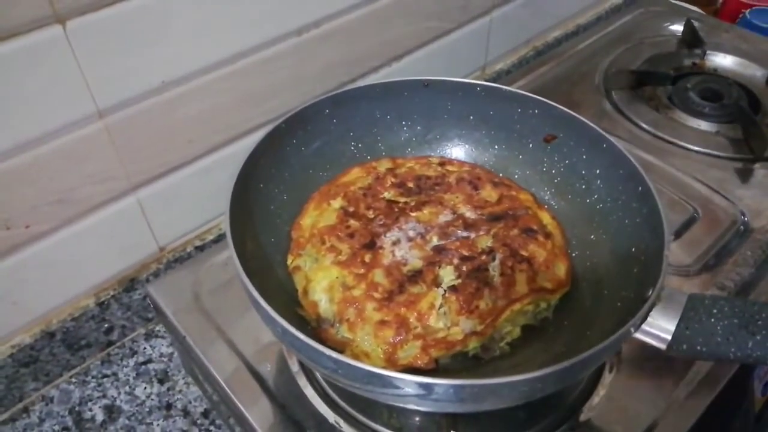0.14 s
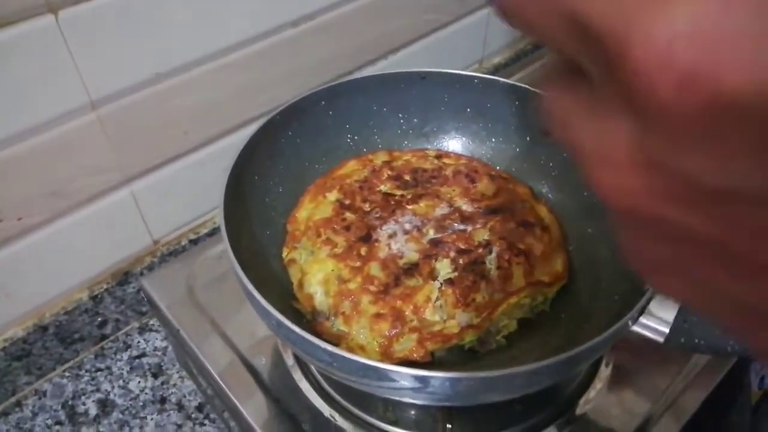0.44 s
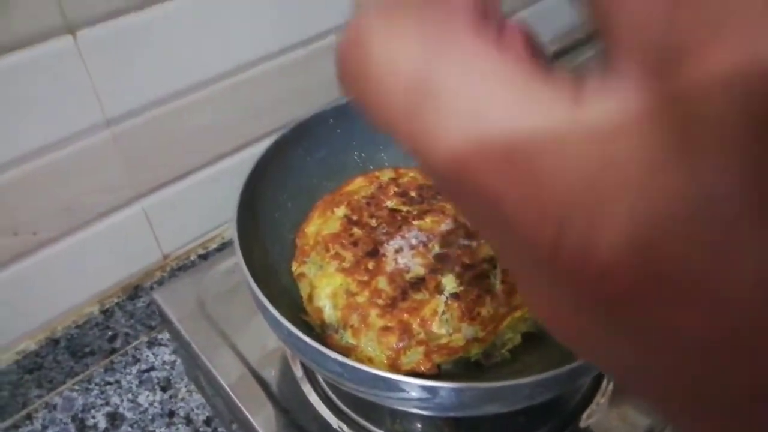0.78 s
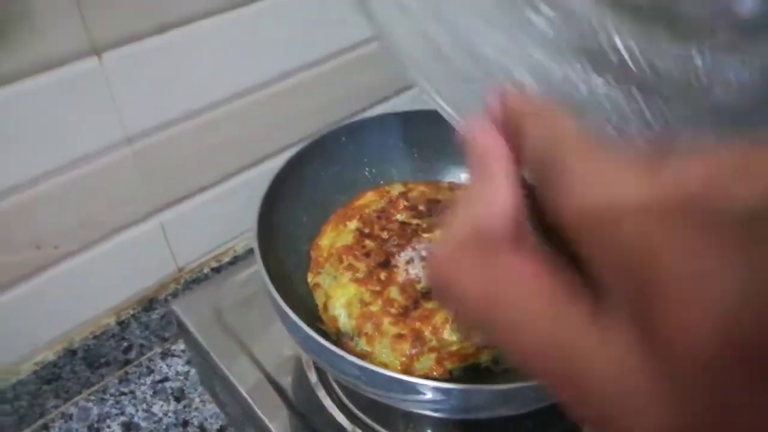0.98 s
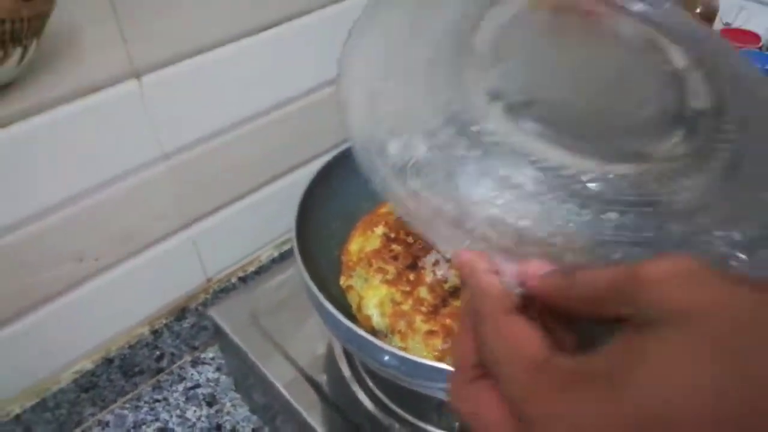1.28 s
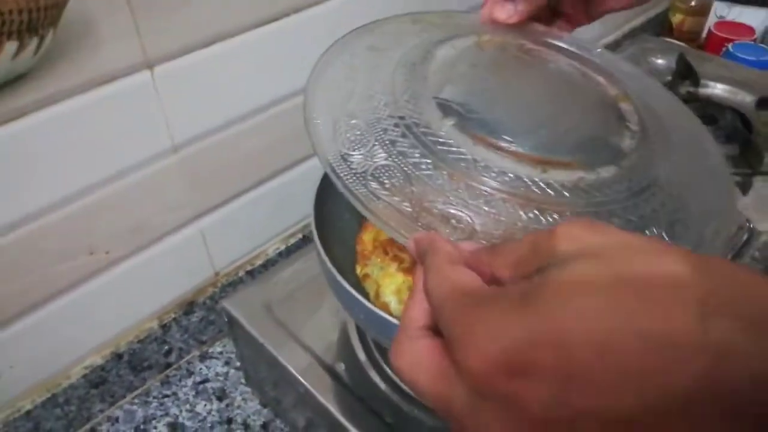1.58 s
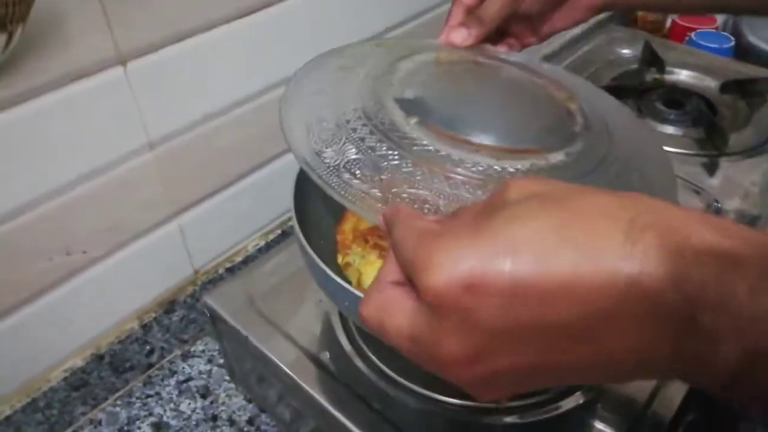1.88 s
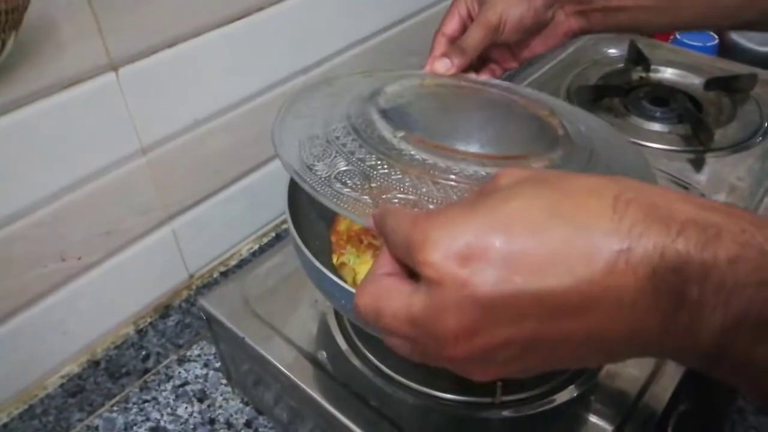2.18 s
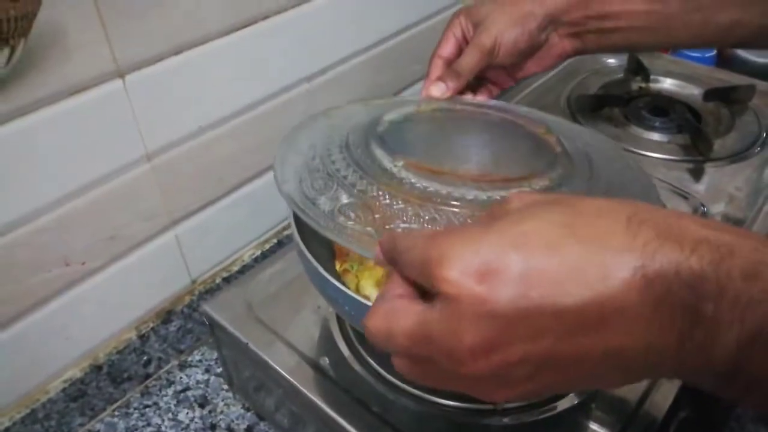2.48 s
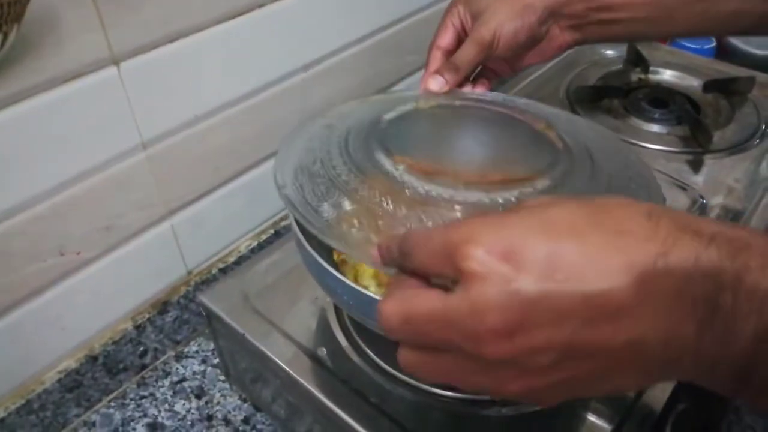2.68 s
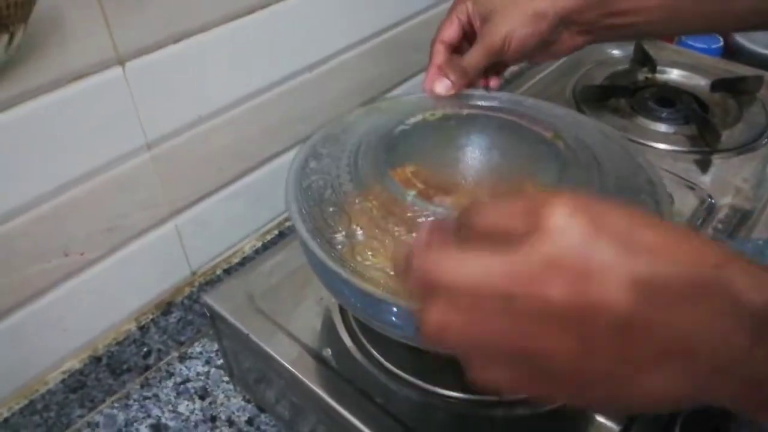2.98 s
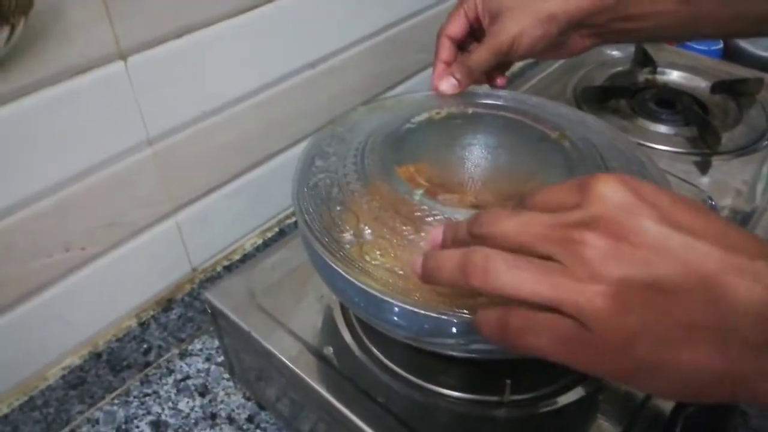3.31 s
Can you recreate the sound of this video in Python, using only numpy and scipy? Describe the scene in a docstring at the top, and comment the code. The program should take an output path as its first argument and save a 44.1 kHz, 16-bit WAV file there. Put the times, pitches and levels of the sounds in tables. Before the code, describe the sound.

A glass plate strikes a frying pan with a loud, bright clink at about 2.7 seconds. Before it, quiet sliding scrapes at 0.2-0.45, a faint glassy tick and singing near 0.7-0.8, fat spitting mostly from 1.2 to 2.1, then light rim knocks around 2.5. The clink rings briefly while the steel stove booms, damped by 3.2; a faint low press follows. Soft flame noise, close microphone, tiled kitchen.

```python
"""Glass plate set on a hot pan

A glass plate slides off the counter and is set upside down on a hot frying pan in a tiled kitchen.
Friction makes it sing faintly as it is picked up, fat spits in filtered noise bursts, and its rim touches
lightly. It lands with a loud clink: decaying sine modes of glass and pan ring under noise bursts,
and the steel stove booms until the hand settles on it. A gas flame and room reverberation lie beneath."""
import sys
import numpy as np
from scipy import signal
from scipy.fft import rfft, irfft
from scipy.io import wavfile
from scipy.ndimage import uniform_filter1d

SR = 44100
rng = np.random.default_rng(int(sys.argv[2]) if len(sys.argv) > 2 else 0)


def int16_out(signal):
    """Quantize to a 16-bit WAV file."""
    q = np.round(np.clip(np.atleast_2d(signal).T, -1, 1) * 32767)
    wavfile.write(sys.argv[1], SR, q.astype(np.int16))


N = 152145
TIME = np.arange(N) / SR
SIDES = np.array([[1], [-1]])  # left, right
CUTOFF_HZ = 17000

# Contacts as the plate lands on the pan. Each row: start in seconds, level in dB,
# contact brightness (low-pass corner) in Hz, left-right difference in dB.
LANDING = [(2.722, -21, 5030, -3), (2.7269, -1, 806, -2), (2.7283, 3, 4520, -5.5), (2.73, 0.5, 9450, -3),
           (2.7313, -5.5, 8000, -0.5)]
# Light touches of the rim that nudge the pan. Each row: start in seconds, knock level in dB,
# glass ring level in dB.
TOUCHES = [(2.4681, -33, -41.5), (2.532, -43.5, -64), (2.586, -46.5, -50)]
# Modes of the glass plate. Each row: frequency in Hz, relative level when struck in dB, when touched in dB,
# when rubbed in dB, time of the rubbed swell in seconds, free t60 in seconds, left-right difference in dB.
PLATE_MODES = [(1950, -3, -3.5, -49.5, 0.821, 0.18, -2.5), (2795, -13, -10, -62, .72, 0.09, -9),
               (2815, 7, -4, -66, 0.786, 0.15, 2), (3430, -13, -7.5, -66, 0.8, 0.13, -6),
               (3972, -16, -5, -51.5, .778, 0.12, -1), (4035, -18, -17, -61, .805, 0.13, -2),
               (4697, 4.5, -12, -54, 0.735, 0.089, -5), (5210, -13, -7, -52, 0.72, 0.12, -6),
               (5540, -11, -13, -54, 0.78, 0.17, -0.5), (6550, -2.5, -20, -55, .778, 0.18, -3),
               (6790, -7, -14, -54, 0.76, 0.16, -8), (8100, -20, -21.5, -75, .772, 0.22, 8)]
# Spectrum of hissing noise. Each row: frequency in Hz, relative density in dB per Hz.
HISS_COLOUR = [(500, -7.5), (2000, -2.5), (3200, 2), (4500, -1.5), (6300, 10.5), (8000, -1), (10000, -7.5),
               (12000, -10.5), (16000, -12)]
# Coherence of diffuse sound. Each row: frequency in Hz, left-right correlation from -1 to 1.
LIKENESS = [(100, 1), (250, 0.91), (420, -0.014), (650, -0.34), (950, -0.16), (1400, 0.3), (2500, -0.099),
            (8000, 0.11), (12000, 1)]


def from_db(db):
    """Amplitude ratio of a level: 20 dB is a factor of ten."""
    return 10 ** (np.asarray(db) / 20)


def rms_one(x):
    """Normalise to unit mean-square power."""
    return x / np.sqrt(np.mean(x ** 2) + 1e-20)


def at_hz(points, hz):
    """Interpolate a spectrum linearly over log frequency."""
    table = np.array(points)
    return np.interp(np.log(hz), np.log(table[:, 0]), table[:, 1])


def level(points):
    """Gain envelope interpolated in decibels from rows of seconds and dB."""
    return from_db(np.interp(TIME, *np.transpose(points)))


def pan(db):
    """Level difference between the sides: a positive value favours the left."""
    return from_db(db * SIDES / 2)


def decay(start, t60):
    """Exponential energy loss: a sudden start falls 60 dB in t60 seconds."""
    elapsed = np.clip((TIME - start) / t60, 0, 10)
    return (TIME >= start) * np.exp(-np.log(1000) * elapsed)


def convolve(x, response):
    """Linear superposition: every instant of x excites a copy of the response."""
    return signal.fftconvolve(np.atleast_2d(x), response, axes=1)[:, :N]


def click(s, gain):
    """An impulsive contact: one sample of the given strength."""
    return gain * (np.arange(N) == int(s * SR))


def cut(x, hz, kind):
    """Second-order Butterworth low-pass or high-pass filter."""
    sections = signal.butter(2, min(hz, CUTOFF_HZ), kind, fs=SR, output="sos")
    return signal.sosfilt(sections, x + 1e-18)


def noise(colour, likeness=None):
    """Partly coherent stereo noise: mid and side spectra mixed by correlation, at unit power."""
    # Balance of diffuse sound. Each row: frequency in Hz, left-right difference in dB.
    balance = [(100, 0), (500, -2), (1400, -1.5), (3000, -1.5), (5500, -5), (8500, 2.5), (14000, 0.5)]
    hz = np.maximum(np.arange(N // 2 + 1) * SR / N, 1)
    mid, side = rfft(rng.standard_normal((2, N)))
    alike = np.clip(at_hz(LIKENESS, hz) if likeness is None else likeness, -1, 1)
    gain = from_db(at_hz(colour, hz) + SIDES * at_hz(balance, hz) / 2)
    spectrum = np.sqrt(1 + alike) * mid + np.sqrt(1 - alike) * side * SIDES
    return rms_one(irfft(gain * spectrum, N))


def ringing(modes):
    """Modal impulse response: decaying sines, with a left-right phase offset set by the coherence."""
    attack_s = 0.00054
    out = 0
    for hz, db, t60, pan_db in modes:
        phase_gap = np.arccos(np.clip(at_hz(LIKENESS, hz), -1, 1)) * rng.choice([-1, 1])
        sine = np.sin(2 * np.pi * hz * TIME + phase_gap * SIDES / 2)
        out = out + from_db(db) * pan(pan_db) * decay(0, t60) * sine
    return out * (1 - np.exp(-TIME / attack_s))


def grains(per_s, spread_db):
    """Random impulse process: clicks of either sign and uneven size, at unit power."""
    sizes = from_db(spread_db * np.minimum(rng.exponential(1, N), 5)) * rng.choice([-1, 1], N)
    return rms_one(sizes * (rng.random(N) < per_s / SR))


def kitchen():
    """Diffuse reverberation: noise bands decay at their own rates, together of unit energy."""
    # Reverberation of the tiled room. Each row: band centre in Hz, t60 in seconds.
    room_t60 = [(100, 1), (400, 0.77), (1500, 0.67), (4000, 0.61), (7000, 0.55), (12000, 0.49)]
    build_s = 0.0007
    hz = np.maximum(np.arange(N // 2 + 1) * SR / N, 1)
    diffuse = rfft(noise([(1, 0)]))
    tail = 0
    for centre, t60 in room_t60:
        # triangular bands on log frequency add up to one
        band = at_hz([(f, f == centre) for f, _ in room_t60], hz)
        tail = tail + irfft(diffuse * band, N) * decay(0, t60)
    return rms_one(tail * (1 - np.exp(-TIME / build_s))) / np.sqrt(N)


def flame():
    """Broadband turbulence: steady coloured noise for the gas flame and kitchen background."""
    # Background spectrum. Each row: frequency in Hz, relative density in dB per Hz.
    flame_colour = [(25, 12.5), (50, -1.5), (90, 2), (140, 2.5), (200, -5.5), (300, -2), (480, -13),
                    (850, -8.5), (1800, -15), (3000, -23.5), (6500, -28), (10000, -42.5), (16000, -44)]
    return from_db(-48) * noise(flame_colour)


def frying():
    """Impulsive bursts in fat: hiss and crackle share one envelope; each spit is a snap and a fizz."""
    # Spectrum of spitting fat. Each row: frequency in Hz, relative density in dB per Hz.
    fat_colour = [(300, 3), (1500, 8), (2500, -0.5), (3500, -2.5), (5000, 5), (6500, 8), (8000, 6.5),
                  (10000, -2.5), (12500, -8.5), (16000, -12.5)]
    # Vigour of the sizzle. Each row: time in seconds, level in dB.
    sizzle = [(0, -57.5), (.25, -58.5), (.6, -59.5), (1.05, -61), (1.16, -53.5), (1.22, -46.5),
              (1.32, -49.5), (1.48, -47), (1.64, -55.5), (1.79, -53), (1.9, -56.5), (2.4, -58.5),
              (2.75, -63.5), (3.4, -72)]
    # Spits of fat. Each row: start in seconds, level in dB, left-right difference in dB,
    # high-pass corner in Hz.
    spits = [(1.1928, -32.5, -11.5, 2200), (1.3495, -26.5, 5, 5370), (1.412, -40, 0, 4000),
             (1.4468, -35, 4, 4500), (1.459, -34, -6, 1100), (1.467, -48, 4, 3500), (1.526, -29, -5, 4000),
             (1.561, -37.5, 4, 3000), (1.745, -38.5, 5, 5000), (1.8175, -34.5, 12, 4580),
             (1.918, -42.5, 4, 4500), (1.992, -42.5, 7, 4500), (2.1525, -41, 2, 4500)]
    crackle_db, hiss_db = -4, -5
    snap_t60_s, fizz_db, fizz_t60_s = 0.0051, -10.5, 0.16

    fat = noise(fat_colour, likeness=0.13)
    snap = noise(fat_colour, likeness=0.18) * decay(0, t60=0.0069)
    crackle = convolve(grains(per_s=1200, spread_db=-0.5), snap)
    crackle = rms_one(cut(crackle, 4000, "high"))
    out = level(sizzle) * (from_db(crackle_db) * crackle + from_db(hiss_db) * noise(HISS_COLOUR))
    for s, db, pan_db, low_hz in spits:
        fizz = from_db(fizz_db) * decay(s, fizz_t60_s)
        spit = fat * (pan(pan_db) * decay(s, snap_t60_s) + fizz)
        out = out + from_db(db) * cut(spit, low_hz, "high")
    # the first spit bursts with a hollow pop: Hz, dB, t60 in seconds, left-right dB
    first_s, _, first_pan_db, _ = spits[0]
    pop = ringing([(2620, -38.5, 0.026, first_pan_db)])
    return out + convolve(click(first_s, 0.93), pop)


def slides():
    """Sliding friction as noise: each stroke opens with a hollow scrape and fades into a rustle."""
    # Strokes over the counter. Each row: start in seconds, length in seconds, rustle level in dB,
    # treble tilt in dB per octave, scrape level in dB.
    strokes = [(0.197, 0.048, -49, 4.5, -54), (0.265, 0.089, -55.5, 4.5, -60),
               (0.39, 0.072, -42, -0.5, -38.5)]
    # Rustle spectrum before the tilt. Each row: frequency in Hz, relative density in dB per Hz.
    rustle_colour = [(100, -2), (250, 0.5), (600, -3.5), (900, 0.5), (1300, 2), (2600, -3), (3600, -4),
                     (5300, -8), (6500, -6), (9000, -20.5), (12000, -49), (16000, -37)]
    # Scrape spectrum. Each row: frequency in Hz, relative density in dB per Hz.
    scrape_colour = [(900, -22), (1700, -9.5), (2150, -1.5), (2500, -7.5), (3300, -16), (6000, -45)]
    attack_s, build_s, release_s, scrape_t60_s = 0.013, 0.023, 0.035, 0.33
    out = 0
    for start, length, db, tilt_db, scrape_db in strokes:
        attack = np.clip((TIME - start) / attack_s, 0, 1)
        build = np.clip((TIME - start) / build_s, 0, 1)
        release = np.exp(-np.maximum(TIME - start - length, 0) / release_s)
        tilted = [(hz, band_db + tilt_db * np.log2(hz)) for hz, band_db in rustle_colour]
        rustle = noise(tilted) * from_db(db) * release * build
        scrape = attack * from_db(scrape_db) * decay(start, scrape_t60_s) * noise(scrape_colour)
        out = out + rustle + scrape
    return out


def singing():
    """Frictional excitation: the rim catches with a tick, and as contact travels round, modes swell in turn."""
    # Rim dragging and exciting the glass. Each row: time in seconds, level in dB.
    rim_drag = [(.66, -83), (.705, -70), (.714, -60), (.80, -71.5), (.84, -82), (.92, -82), (.955, -72),
                (1.03, -84)]
    catch_s, catch_db, catch_t60_s, catch_low_hz = .708, -45.5, .07, 4500
    grip_s, swell_width_s, swell_steepness = 0.0036, 0.016, 1.7
    rubbed_ring_share = 0.58  # friction shortens the ring and roughens the tone

    tick = cut(noise(HISS_COLOUR), catch_low_hz, "high")
    out = from_db(catch_db) * decay(catch_s, catch_t60_s) * tick
    gripped = np.clip((TIME - catch_s) / grip_s, 0, 1)
    friction = grains(per_s=900, spread_db=4.0)
    drag = level(rim_drag)
    for hz, _, _, db, swell_s, t60, pan_db in PLATE_MODES:
        mode = ringing([(hz, 0, t60 * rubbed_ring_share, pan_db)])[:, :SR // 2]
        tone = convolve(friction, mode)
        # even out the slow level changes of the random excitation
        power = uniform_filter1d(np.mean(tone ** 2, axis=0), size=1300)
        tone = tone / np.sqrt(power + 1e-9)
        distance = np.abs((TIME - swell_s) / swell_width_s)
        swell = from_db(db) / (1 + distance ** swell_steepness)
        out = out + tone * (gripped * swell + drag)
    return out


def touches():
    """Damped impact: light contacts make the pan knock dully on the stove, as decaying noise."""
    # Knock spectrum. Each row: frequency in Hz, relative density in dB per Hz.
    knock_colour = [(80, -20), (170, -10), (280, 3.5), (420, -2), (620, 3), (780, -2.5), (950, 0),
                    (1200, -9), (1600, -14), (3000, -18.5), (6000, -27), (9000, -41), (14000, -50)]
    knocks = sum(from_db(db) * decay(s, t60=0.14) for s, db, _ in TOUCHES)
    return noise(knock_colour) * knocks


def stove():
    """Plate resonance: the blow makes the stove top boom until the hand damps it, then presses down."""
    # Modes of the sheet-steel stove top. Each row: frequency in Hz, relative level in dB,
    # undamped t60 in seconds, left-right difference in dB.
    stove_modes = [(106, -0.5, 1.96, -1), (137.6, -7, 1.87, 1.5), (233, -5, 0.76, 0), (269.6, 0, 0.83, -2),
                   (307.6, -3, 0.59, 11), (347.6, -4, 0.8, -6)]
    stove_db, damped_s, damped_t60_s = -28.5, 3.195, 0.027
    press_s, press_db = 3.325, -50
    steel = ringing(stove_modes)
    damping = np.where(TIME < damped_s, 1, decay(damped_s, damped_t60_s))
    boom = convolve(click(LANDING[1][0], from_db(stove_db)), steel) * damping
    press = convolve(click(press_s, from_db(press_db)), steel * decay(0, t60=0.55))
    return boom + cut(press, hz=180, kind="low")


def landing():
    """High modal density: dense, short-lived modes of each contact merge into a noise crack and clatter."""
    # Spectrum of glass on metal. Each row: frequency in Hz, relative density in dB per Hz.
    clash_colour = [(55, -7), (110, -0.5), (180, -4), (320, 3.5), (500, -2.5), (700, -1), (1400, -1),
                    (2300, -4), (3100, 2), (4000, -2), (4900, 0), (6800, 1), (8500, -3.5), (10500, -14),
                    (13000, -18), (16000, -50)]
    crack_db, crack_t60_s, clatter_db, clatter_t60_s = -13.5, 0.017, -21, 0.23
    out = 0
    for s, db, bright_hz, pan_db in LANDING:
        crack = from_db(crack_db) * decay(s, crack_t60_s)
        clatter = from_db(clatter_db) * decay(s, clatter_t60_s)
        burst = noise(clash_colour, likeness=0.38) * (crack + clatter)
        out = out + from_db(db) * pan(pan_db) * cut(burst, bright_hz, "low")
    return out


def clink():
    """Modal excitation by impact: touches tinkle the glass, and the landing rings glass and pan."""
    # Modes of the pan. Each row: frequency in Hz, relative level in dB, t60 in seconds,
    # left-right difference in dB.
    pan_modes = [(713, -4, 0.43, 4), (730, 0, 0.65, 4.5), (953, -8, 0.44, -4), (1117, -5, 0.42, 3),
                 (1176, -1, 0.32, 3), (1280, -7, 0.44, -1), (1472, -5, 0.21, 13), (1910, -5, 0.4, 4),
                 (3240, 1, 0.24, -8), (3610, -6, 0.3, -2), (4400, 3, 0.34, -1), (4800, 4, 0.2, 1),
                 (5700, 0, 0.3, 1.5), (6239, 4, 0.15, 0)]
    plate_db, pan_level_db = -18.5, -27
    struck = ringing([(hz, db, t60, pan_db) for hz, db, _, _, _, t60, pan_db in PLATE_MODES])
    touched = ringing([(hz, db, t60, pan_db) for hz, _, db, _, _, t60, pan_db in PLATE_MODES])
    taps = sum(click(s, from_db(db)) for s, _, db in TOUCHES)
    blow = click(LANDING[2][0], 1)
    both = from_db(plate_db) * struck + from_db(pan_level_db) * ringing(pan_modes)
    return convolve(taps, touched) + convolve(blow, both)


def scene():
    """Superposition of direct sources, their reverberation and the flame."""
    handling = slides() + singing()
    fat = frying()
    blows = touches() + landing()
    rings = clink()
    # sends to the room, in dB
    into_room = from_db(-8) * handling + from_db(-8.5) * fat + from_db(-1.82) * blows + from_db(-13.5) * rings
    room = convolve(into_room[1], kitchen())  # the right side feeds the room
    return handling + fat + blows + rings + stove() + room + flame()


def record(dry):
    """Dynamic compression: gain ducks on the blow and recovers; peaks are rounded, deep bass and top cut."""
    limit_db, limit_share, attack_s, recovery_db_per_s = -15.5, 0.6, 0.0057, 20
    power = uniform_filter1d(np.mean(dry ** 2, axis=0), size=128)
    loud_db = 10 * np.log10(np.maximum(power, 1e-12))
    cut_db = limit_share * np.maximum(loud_db - limit_db, 0)
    # hold the largest reduction and release it at a constant rate
    recovery_db = recovery_db_per_s * TIME
    held_db = np.maximum.accumulate(cut_db + recovery_db) - recovery_db
    keep = np.exp(-1 / (attack_s * SR))
    gain = from_db(-signal.lfilter([1 - keep], [1, -keep], held_db))
    wet = np.tanh(cut(dry, 78, "high") * gain)
    return signal.sosfilt(signal.cheby2(12, 70, CUTOFF_HZ, fs=SR, output="sos"), wet)


dry = scene()
out = record(dry)
int16_out(out)
```